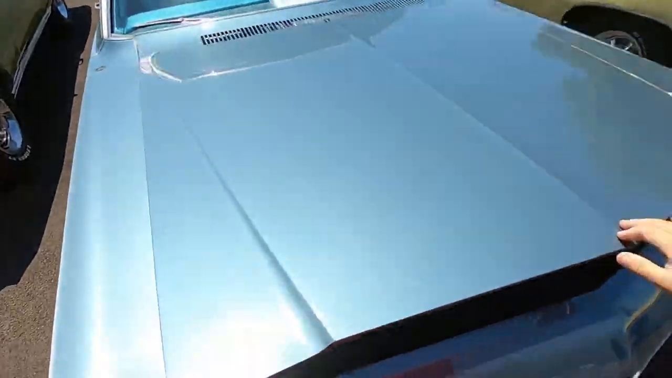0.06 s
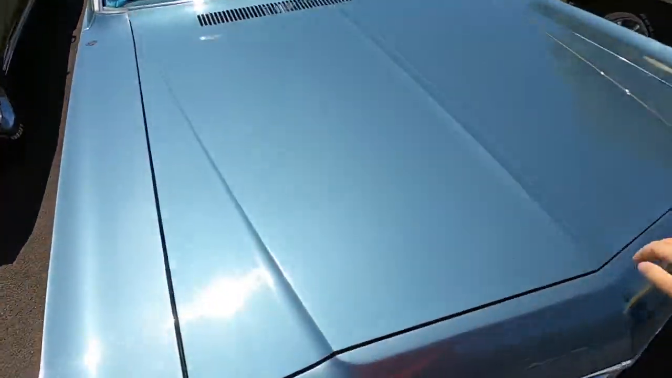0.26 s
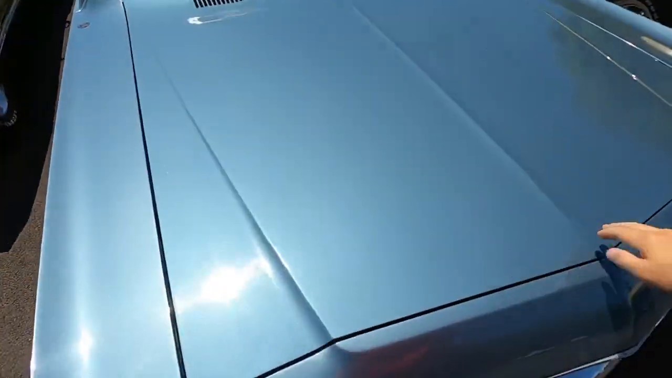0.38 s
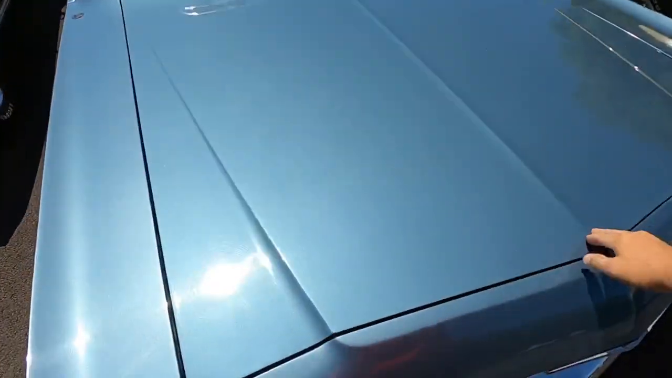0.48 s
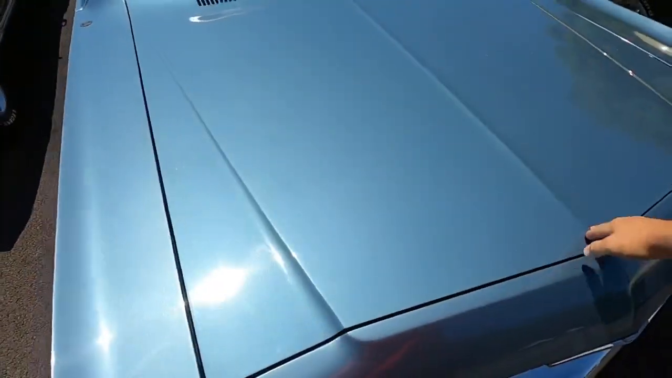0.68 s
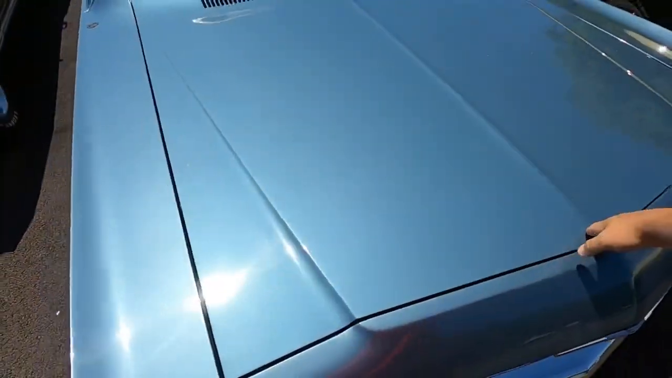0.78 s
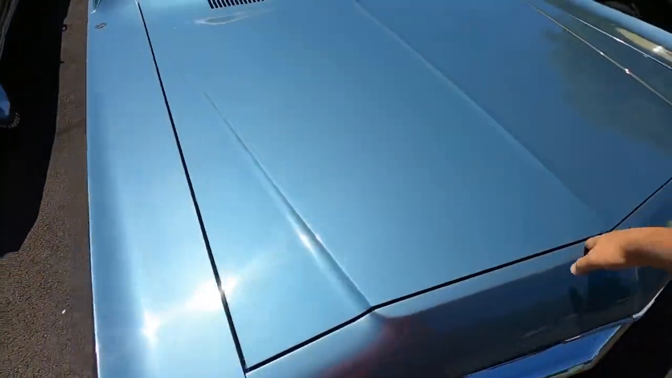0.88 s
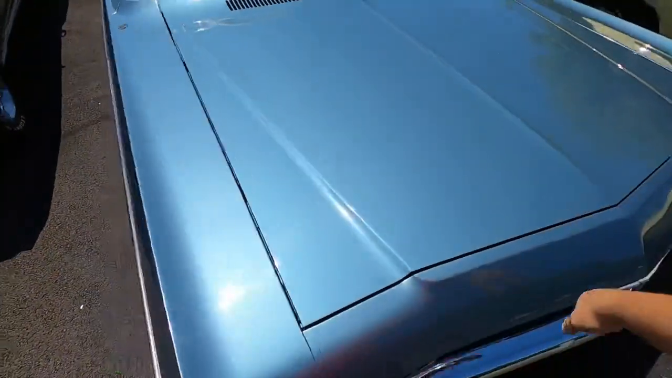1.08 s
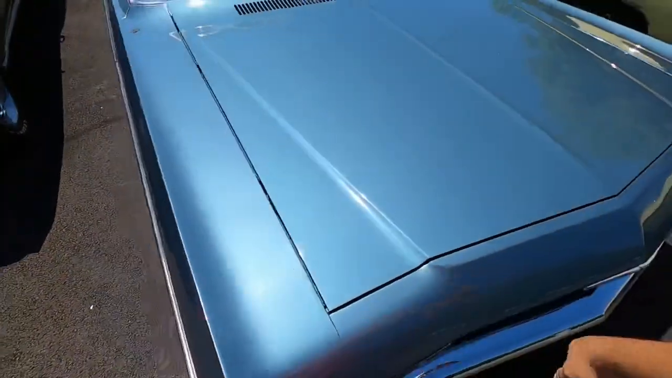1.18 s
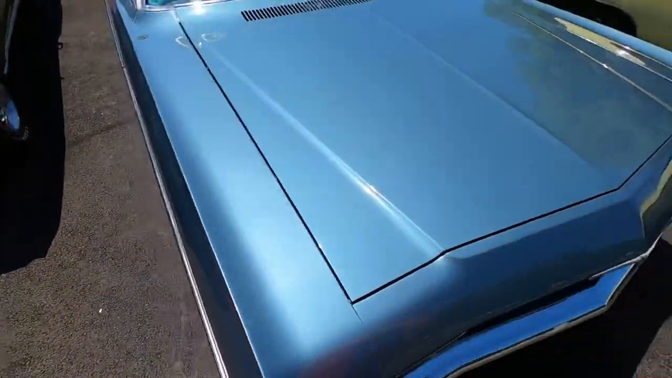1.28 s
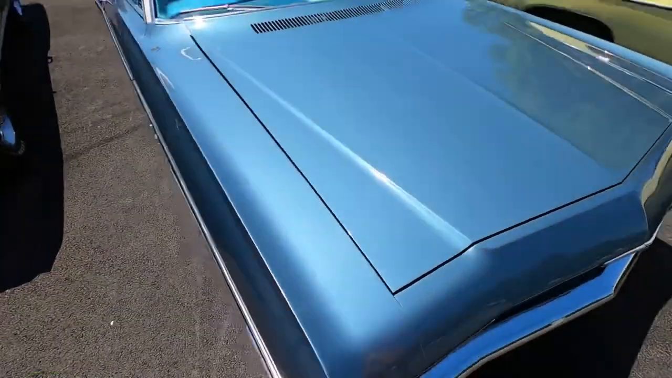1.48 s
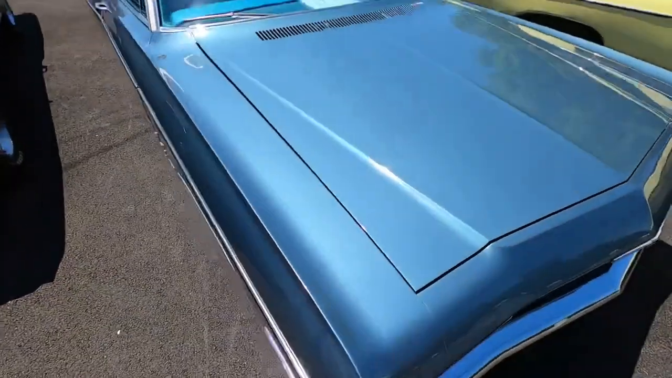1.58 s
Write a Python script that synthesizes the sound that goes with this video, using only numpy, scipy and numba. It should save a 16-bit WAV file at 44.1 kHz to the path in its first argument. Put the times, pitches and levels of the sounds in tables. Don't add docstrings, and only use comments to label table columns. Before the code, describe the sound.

Car hood bangs closed outdoors, latch snapping and sheet metal rattling briefly, with distant traffic humming.

```python
import sys
import numpy as np
from scipy import signal
from scipy.io import wavfile
from scipy.ndimage import uniform_filter1d
from numba import njit

SR = 44100
rng = np.random.default_rng(int(sys.argv[2]) if len(sys.argv) > 2 else 0)


def wav_out(sig):
    wavfile.write(sys.argv[1], SR, np.round(np.clip(np.atleast_2d(sig).T, -1, 1) * 32767).astype(np.int16))


def magnitude_from_level(level_db):
    exponent = np.asarray(level_db, float) / 20
    return 10 ** exponent


N = 70560


def read(table, hz):
    f, v = np.array(table, float).T
    return np.interp(np.log(hz), np.log(f), v)


def curve(table):
    s, v = np.array(table, float).T
    return np.interp(np.arange(N) / SR, s, v)


def unit(x):
    return x / np.sqrt(np.mean(x ** 2))


def filtered(x, order, hz, kind="low"):
    return signal.lfilter(*signal.butter(order, hz, kind, fs=SR), x)


def walk(rate):
    k = int(SR / rate)
    held = np.repeat(rng.standard_normal(N // k + 1), k)
    return 0.56 * uniform_filter1d(uniform_filter1d(held, k), k)[:N]


def band(hz, width_hz):
    b, a = signal.iirpeak(hz, hz / width_hz, fs=SR)
    once = signal.lfilter(b, a, rng.standard_normal(N))
    return unit(signal.lfilter(b, a, once))


def ports(mid, side, pan_db, like):
    like = np.clip(like, -1, 1)
    shared, unshared = np.sqrt((1 + like) / 2) * mid, np.sqrt((1 - like) / 2) * side
    return np.array([(shared + unshared) * magnitude_from_level(pan_db / 2), (shared - unshared) * magnitude_from_level(-pan_db / 2)])


@njit
def ring(x, hz, t60, gain):
    out = np.zeros((2, len(x)))
    for m in range(len(hz)):
        p, z = np.exp(2j * np.pi * hz[m] / SR - np.log(1000) / (t60[m] * SR)), 0j
        for i in range(len(x)):
            z = z * p + x[i]
            out[0, i] += (gain[0, m] * z).imag
            out[1, i] += (gain[1, m] * z).imag
    return out


# t/s, level/dB, ring f/Hz, ring level/dB
CLICKS = [(.2018, 3.5, 2240, -6.5), (0.2047, -7.5, 2470, -14), (.2105, -2, 2036, -5),
          (0.2197, 4.5, 6800, -13), (0.2236, -20, 3500, -15), (0.2447, 0.5, 9500, -11),
          (0.2534, -9.5, 8840, -16), (.263, -4.5, 1170, -32), (0.4695, -27, 7000, -30),
          (0.471, -29, 8390, -41), (0.504, -33.5, 9100, -44)]
BANG_S = CLICKS[0][0]
# t/s, level/dB
SHAKE = [(.2, -30.5), (.235, -14), (.265, -11.5), (.29, -16), (.34, -21), (.445, -29), (.47, -34.5),
         (.52, -39), (.7, -57.5)]


def rattle(start, n, places):
    taps_per_s, spread_db = 3800, 3
    chatter_db, chatter_s = -10.5, 0.0047
    hard_db, hard_until_s, hard_fade_s = 3, 0.26, 0.0098
    t = (start + np.arange(n)) / SR
    shake = magnitude_from_level(curve(SHAKE)[start:start + n])
    for s, db, _, _ in CLICKS:
        u = t - s
        shake = shake + (u > 0) * magnitude_from_level(db + chatter_db) * np.exp(-np.maximum(u, 0) / chatter_s)
    chance = rng.random((places, 3, n))
    hit = chance[:, 0] < taps_per_s / SR
    sign = np.sign(chance[:, 1] - .5)
    strength = magnitude_from_level(-spread_db * np.log(chance[:, 2] + 1e-9))
    force = shake * hit * sign * strength + 1e-18
    for j, (s, db, _, _) in enumerate(CLICKS):
        force[j % places, int(s * SR) - start] += magnitude_from_level(db)
    hard = magnitude_from_level(hard_db) / (1 + np.exp((t - hard_until_s) / hard_fade_s))
    return force + hard * filtered(force, 2, 3900, "high")


# f/Hz, level/dB
HOOD_PAN = [(60, 4), (110, 0.5), (200, -1), (380, 0), (700, -8.5), (1290, -4.5), (2380, -8.5), (4400, -1.5),
            (8120, -15.5), (15000, -30)]
# f/Hz, likeness/-1..1
HOOD_LIKE = [(60, 1), (130, 0.97), (290, 0.99), (640, 0.64), (1410, 0.16), (3100, 0.78), (6820, -0.72),
             (15000, -0.81)]


def latch_pings(start, n):
    t60_s, rise_s = .02, 0.00051
    pings = np.zeros((2, n))
    for s, _, hz, ring_db in CLICKS:
        k = int(s * SR) - start
        u = np.arange(n - k) / SR
        fade = magnitude_from_level(ring_db - 60 * u / t60_s) * np.minimum(u / rise_s, 1)
        ping = np.sin(2 * np.pi * hz * u) * fade
        pings[:, k:] += ports(ping, ping / 2, read(HOOD_PAN, hz), read(HOOD_LIKE, hz))
    return pings


# f/Hz, level/dB per Hz
SHEET = [(120, -30), (200, 1), (506, -1.5), (906, -10), (1050, -8), (2060, -11), (5200, -27.5),
         (8820, -36.5), (15500, -60)]
# f/Hz, t60/s
SHEET_T60 = [(300, 0.6), (1000, 0.26), (3000, 0.082), (6000, 0.035), (14000, .015)]


def sheet(count=300, places=3):
    start, n = int(BANG_S * SR), SR // 2
    rung = 0
    for force in rattle(start, n, places):
        hz = 190 + 15400 * ((np.arange(count) + rng.random(count)) / count) ** 2
        phase = np.exp(2j * np.pi * rng.random(count))
        side = 1j * phase * np.sign(rng.standard_normal(count))
        gain = ports(phase, side, read(HOOD_PAN, hz), read(HOOD_LIKE, hz))
        t60 = read(SHEET_T60, hz)
        weight = magnitude_from_level(read(SHEET, hz)) * np.sqrt(np.sqrt(hz) / t60)
        rung = rung + ring(force, hz, t60, gain * weight)
    out = np.zeros((2, N))
    level = magnitude_from_level(-13) / np.std(rung[:, :SR // 10])
    out[:, start:start + n] = level * rung + latch_pings(start, n)
    return out


# t/s, level/dB, contact/ms
THUDS = [(0.206, -6, 1.9), (0.2156, -7.5, 2.9), (0.2261, -3.5, 4.8), (0.2423, -5.5, 2.6),
         (0.2517, -5.5, 3.6), (0.2606, -2.5, 2.54), (0.2694, -3, 2.57), (.283, -5.5, 2.4), (.30, -8.5, 1.8),
         (0.337, -18.5, 3.4), (0.392, -9, 1.2), (0.558, -18.5, 3.9), (0.568, -20.5, 4.16), (.577, -17, 3.9)]
# f/Hz, level/dB, t60/s
BODY = [(49.6, -17, 0.37), (68.5, 1.5, 0.23), (94, -1.5, 0.21), (114.4, 3, .25), (141, -2, 0.72),
        (153, -3.5, .3), (180.2, -6.5, 0.81), (216, -11, 0.13), (249.1, -8, 0.55), (273.6, -11, 0.9),
        (296.2, -4.5, 0.44), (365.3, -11, 1), (465.7, -9, 0.45), (513, -12, 0.55)]


def body():
    shudder = unit(filtered(rng.standard_normal(N), 1, 510))
    force = shudder * magnitude_from_level(curve(SHAKE) - 40) * (np.arange(N) > BANG_S * SR) + 1e-18
    for s, db, ms in THUDS:
        push = np.hanning(int(ms * SR / 1000) + 2)
        k = int(s * SR)
        force[k:k + len(push)] += magnitude_from_level(db) * push / push.sum()
    hz, db, t60 = np.array(BODY, float).T
    side = 1j * np.sign(rng.standard_normal(len(hz)))
    gain = -ports(np.ones(len(hz)), side, read(HOOD_PAN, hz), read(HOOD_LIKE, hz))
    rung = ring(force, hz, t60, gain * magnitude_from_level(db - 12.5))
    return filtered(rung, 2, 25, "high")


# f/Hz, level/dB
STREET_PAN = [(60, -3), (110, 0.5), (200, -1.5), (380, -1), (700, -1.5), (1290, 0), (2380, -3.0),
              (4400, 1.5), (8120, -9), (15000, 15)]
# f/Hz, likeness/-1..1
STREET_LIKE = [(60, 0.71), (130, 0.84), (290, 1), (640, 0.75), (1410, 0.091), (3100, 0.63), (6820, 0.053),
               (15000, -1)]


def wash(colour):
    swell_db, flicker_db = .8, 3
    out, swell = 0, walk(0.63)
    for hz in 28 * 2 ** (np.arange(28) / 3):
        db = read(colour, hz) + 10 * np.log10(hz) + swell_db * swell + flicker_db * walk(14.23)
        sos = signal.butter(3, [hz / 1.14, hz * 1.14], "bandpass", fs=SR, output="sos")
        noise = rng.standard_normal((2, N + SR // 4))
        mid, side = unit(signal.sosfilt(sos, noise)[:, -N:])
        out = out + magnitude_from_level(db) * ports(mid, side, read(STREET_PAN, hz), read(STREET_LIKE, hz))
    return unit(out)


# f/Hz, level/dB per Hz
TYRES = [(400, 3.5), (600, 2.5), (1300, -2.5), (3000, -18.5), (6000, -36)]
# t/s, level/dB
CAR = [(0, -46), (.8, -42.5), (1.1, -40), (1.3, -37.5), (1.6, -33.5)]
# t/s, level/dB
DRONE = [(0, -50), (1.0, -50), (1.1, -38.5), (1.35, -44), (1.5, -43), (1.6, -31)]


def nearing_car():
    tyres = wash([(200, -29)] + TYRES + [(9000, -57)]) * magnitude_from_level(curve(CAR))
    engine = band(140.7, 15.3) * magnitude_from_level(curve(DRONE))
    return tyres + engine


# t/s, level/dB
SQUEAL = [(1.33, -120), (1.37, -77), (1.395, -65), (1.43, -70), (1.52, -72), (1.565, -57), (1.6, -80)]


def brake_squeal():
    hz = 7620 * (1 + 0.00043 * walk(27))
    level = magnitude_from_level(curve(SQUEAL) + 2.5 * walk(45))
    tone = np.sin(2 * np.pi * np.cumsum(hz) / SR) * level
    return ports(tone, 0, -17, 0.42)


# t/s, level/dB
HISS = [(0, -87), (.65, -79), (.75, -75), (1.1, -71), (1.15, -80.5), (1.6, -84)]


def hiss():
    hz, width_hz = 9100, 4500
    return ports(band(hz, width_hz), band(hz, width_hz), -24.5, 0.21) * magnitude_from_level(curve(HISS))


# f/Hz, level/dB per Hz
TRAFFIC = [(15, -37), (25, -5.5), (75, 1.5), (158, -6.5), (191, -6.5), (344, -18), (811, -23.5),
           (9020, -56), (15000, -98)]
# f/Hz, width/Hz, level/dB
ENGINES = [(89.4, 4.7, -39.5), (138, 4, -45), (193.6, 7.8, -49)]


def traffic():
    drones = sum(magnitude_from_level(db) * band(hz, width) for hz, width, db in ENGINES)
    return magnitude_from_level(-32.5) * wash(TRAFFIC) + drones


def scene():
    hood = sheet() + body()
    return hood + nearing_car() + brake_squeal() + hiss() + traffic()


def gain_control(x):
    duck_db, attack_s, drift_db_per_s = -7.5, 0.13, -1.77
    after = np.maximum(np.arange(N) / SR - BANG_S, 0)
    return x * magnitude_from_level(duck_db * (1 - np.exp(-after / attack_s)) + drift_db_per_s * after)


# f/Hz, width/Hz, level/dB
SHELL = [(3350, 720, -7), (6740, 800, -5.5), (8820, 300, -2.5)]


def camera_shell(x):
    x = x + sum(magnitude_from_level(db) * signal.lfilter(*signal.iirpeak(hz, hz / w, fs=SR), x) for hz, w, db in SHELL)
    x = filtered(x, 2, 10400)
    return np.array([filtered(x[0], 2, 8500), x[1]])


def low_pass(x):
    return signal.sosfilt(signal.butter(12, 15700, fs=SR, output="sos"), x)


def record(dry):
    x = camera_shell(gain_control(dry))
    mix = np.tanh(1.149 * x) / 1.085
    return low_pass(mix)


dry = scene()
out = record(dry)
wav_out(out)
```